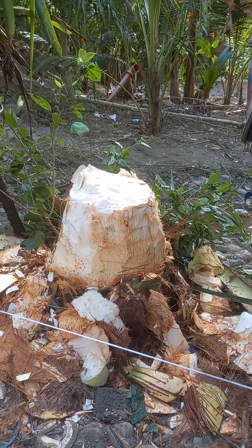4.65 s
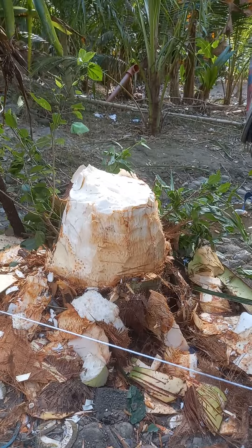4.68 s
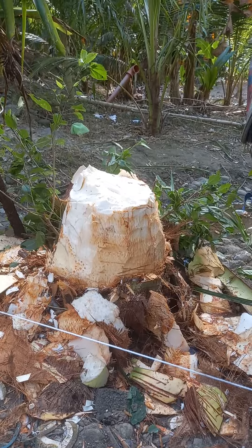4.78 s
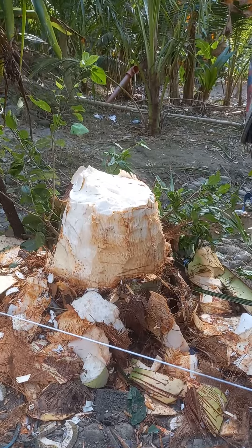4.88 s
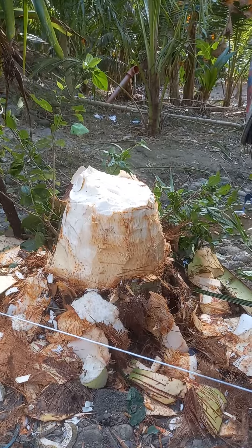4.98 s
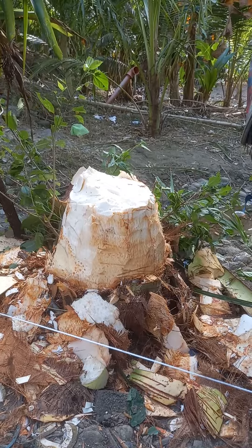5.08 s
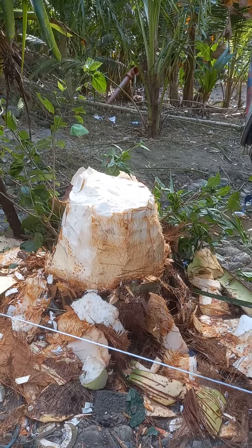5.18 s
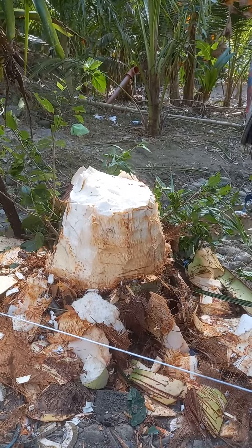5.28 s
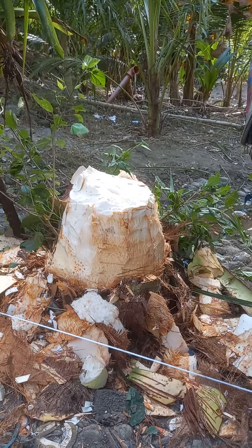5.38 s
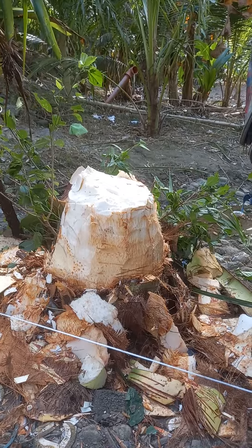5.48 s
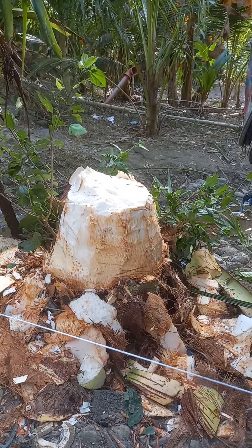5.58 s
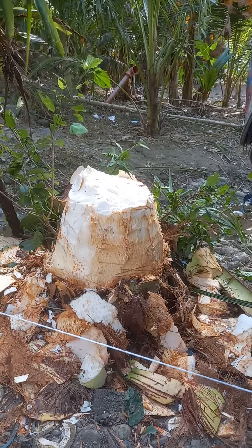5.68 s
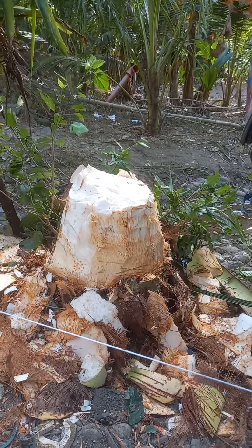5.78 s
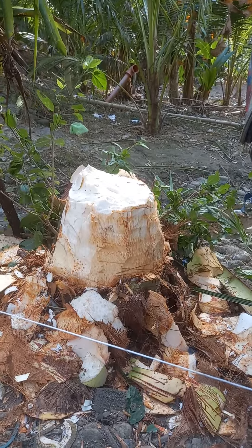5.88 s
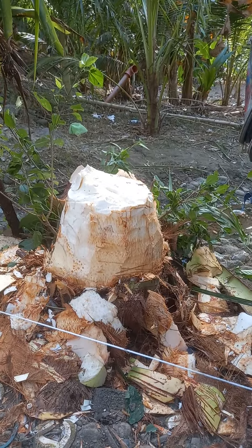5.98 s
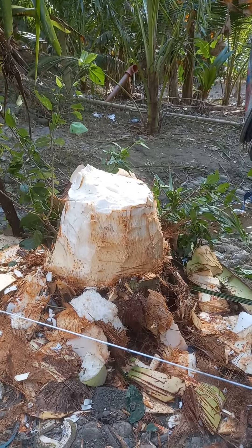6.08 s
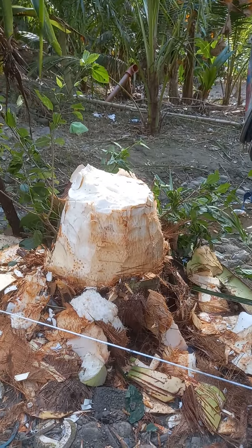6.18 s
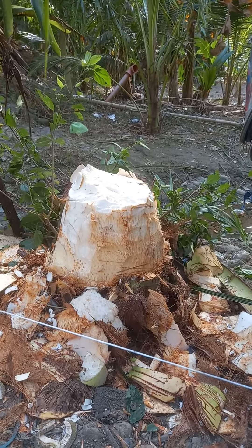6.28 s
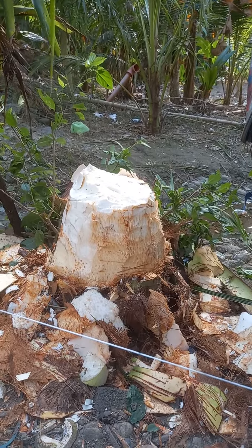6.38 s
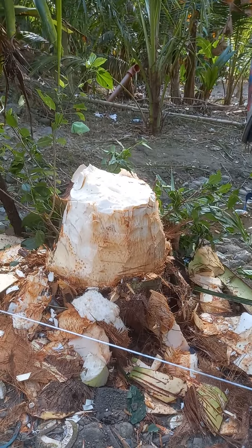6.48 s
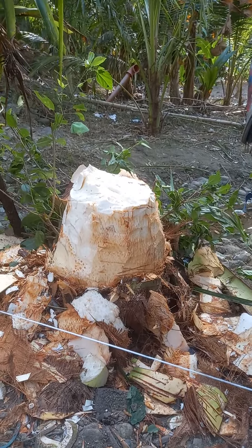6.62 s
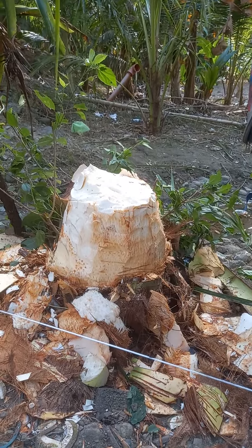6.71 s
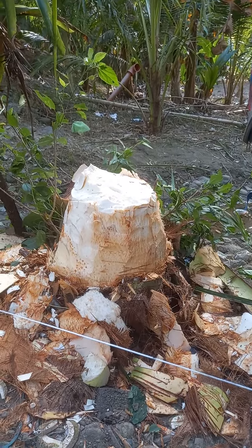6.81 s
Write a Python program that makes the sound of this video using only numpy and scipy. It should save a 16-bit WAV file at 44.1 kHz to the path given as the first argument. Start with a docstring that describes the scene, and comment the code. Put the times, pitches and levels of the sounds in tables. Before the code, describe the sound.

Outdoors in a palm grove, a low motor hum wavers in the distance, strongest at the start. From 0.1 to 0.6 seconds a pig very close by growls and jumps into a rough squeal. A second hoarse cry comes at 0.95 to 1.45. Feet then knock lightly, with sharp crackles of dry husk near 2.1, rustling litter and a faint rising chirp at 1.9. The third call, 2.2 to 3.6, growls, breaks, then climbs to the shrillest, raspiest squeal. Wind begins buffeting both sides unevenly from 3.1 onward. Leaves stir at 3.7 and the bird chirps at 3.9. A fourth squeal runs 3.95 to 4.85, a short soft snort follows at 5.1, another chirp at 5.2, and the last harsh squeal rises, cracks and drops from 5.25 to 6.4. Rustles, small scuffs and gusts finish by 6.85. Echoes are short and diffuse.

```python
"""In a palm grove a pig close by calls five times and snorts once.
Each call opens as a growl of slow flaps ringing the throat and climbs into a rough squeal of two beating
vibrations. Feet knock in dry husks (ringing crackle) and litter rustles (noise that swells and fades).
A bird chirps upward three times (swept sines), a far motor hums (a wavering tone and its octave), and
gusts buffet the two microphone ports (unrelated low noise)."""
import sys
import numpy as np
from scipy import signal
from scipy.fft import rfft, irfft
from scipy.io import wavfile
from scipy.ndimage import uniform_filter1d

SR = 44100
rng = np.random.default_rng(int(sys.argv[2]) if len(sys.argv) > 2 else 0)


def to_wav(sig):
    """Store sig (one row per channel, or 1-D mono) as 16-bit WAV at the path in sys.argv[1].

    Samples outside -1..1 are clipped; the rate is SR.
    """
    pcm = np.clip(np.atleast_2d(sig), -1, 1) * 32767
    pcm = np.round(pcm).astype(np.int16)
    wavfile.write(sys.argv[1], SR, pcm.T)  # frames by channels


N = 302085

# Buffeting noise spectrum. Each row: frequency in Hz, relative density in dB per Hz.
BUFFET_SPECTRUM = [(25, -33.5), (50, -21), (75, 10), (100, 0.5), (150, -5), (250, -45), (500, -62)]
# Gusts. Each row: centre in seconds, level in dB, width between 1/e points in seconds, left over right in dB.
GUSTS = [(3.113, -34.5, 0.071, -12.5), (3.2, -36, 0.051, -19.5), (3.362, -29, 0.13, 18),
         (3.523, -33.5, 0.28, 17), (3.762, -32, 0.16, 15.5), (4.086, -35.5, 0.048, -1.5),
         (4.158, -38, 0.1, 24.5), (4.408, -38, 0.073, 3.5), (4.732, -43, 0.23, 22.5),
         (4.904, -33, 0.1, 2.5), (5.043, -40, 0.13, -18.5), (5.301, -28.5, 0.18, -6.5),
         (5.538, -32, 0.077, 19), (5.859, -37.5, 0.78, -4.5), (6.437, -32, 0.043, 5.5),
         (6.573, -33, 0.11, 21.5), (6.737, -34, 0.15, 10), (6.85, -29.5, 0.081, -11.5)]
# Motor hum. Each row: time in seconds, level in dB.
HUM_LEVEL = [(0, -40.5), (.44, -54.5), (.62, -41.5), (.7, -56.5), (.78, -59.5), (.85, -65), (.92, -43),
             (1.45, -45), (1.57, -51), (1.65, -46.5), (2.0, -51.5), (2.5, -44.5), (2.85, -65.5),
             (3.05, -53.5), (6.85, -57)]
HUM_HZ = 93.2
# Stirring leaves and litter. Each row: time in seconds, level in dB, dull part relative to the leaves in dB.
RUSTLE_LEVEL = [(0, -61, -10), (.68, -59, -8), (.75, -68, -9), (.81, -45.5, -8), (.86, -65, 0),
                (1.6, -62.5, -5), (1.85, -50.5, -8), (1.92, -44, -8), (2.02, -50, -8.5), (3.63, -54.5, 15),
                (3.72, -42.5, -4), (3.84, -47, 0), (3.9, -66.5, 15), (4.9, -49.5, 8), (5.04, -44.5, -11.5),
                (5.16, -58, -8), (6.42, -43, 0.5), (6.65, -48, -10), (6.78, -44, -1), (6.85, -66, -30)]
# Leaf noise spectrum. Each row: frequency in Hz, relative density in dB per Hz.
LEAF_SPECTRUM = [(1060, -43.5), (1800, -12.5), (2160, -11.5), (3880, -13), (4570, -7), (5390, -7.5),
                 (6470, -7.5), (8910, -51), (16000, -17)]
# Rising chirps. Each row: start in seconds, length in seconds, first and last frequency in Hz, relative level in dB.
CHIRPS = [(1.918, 0.12, 5030, 7030, -38.5), (3.857, 0.089, 4920, 6440, -45),
          (5.224, 0.1, 4950, 6800, -45.5)]
# Knocks and scuffs. Each row: start in seconds, overall level in dB, dull part in dB, bright part in dB,
# left over right in dB; the levels are relative.
KNOCKS = [(0.7877, -43, -6.5, -17, 8), (1.4495, -24.5, -14, -35, -3.5), (1.773, -31.5, -15, -31, -6.5),
          (1.84, -27, -23, -34, -4), (1.914, -32, -9, -29, -6), (2.065, -27, -51, -21, -7),
          (2.0968, -14, -4, 1.5, 0.5), (2.1358, -7, -4.5, -7, 0), (2.1818, -13.5, 5.5, 1, -3),
          (2.951, -17, -5.5, 5, 1), (4.0634, -16.5, -34, -19, -3), (4.6968, -21, -39, 14, 6.5),
          (5.0314, -43, -8, -35, -14), (6.428, -38.5, 1, -13, -5), (6.479, -49, -29, -9, 1),
          (6.538, -28.5, -4, -29, -6), (6.573, -36.5, 4, -17, 4), (6.611, -34.5, -0.5, -29, -3),
          (6.639, -34.5, 5, -31, -11), (6.6492, -30.5, 11.5, -40, -2.5), (6.694, -39, -4, -28, 11),
          (6.7017, -33.5, 8.5, -26, -6)]
# Resonances of a dry husk. Each row: frequency in Hz, relative width in Hz (widened in use), level in dB.
HUSK_RESONANCES = [(633, 83, 12), (1250, 187, 4), (1460, 130, 1), (3020, 1500, -4), (4420, 74, 5.5),
                   (5630, 63, -20)]
KNOCK_T60_S, KNOCK_RISE_S = .12, .002
SNAP_DB, SNAP_T60_S = -2.0, .02  # the sharp first snap of a knock

# Squeals, one table a call. Each row: time in seconds, pitch in Hz, then relative levels in dB of the tone,
# its octave, the throat sound and the rasp.
SQUEALS = [
    [(0.08, 665.9, -49.5, -48.5, -38.5, -39.5), (0.12, 708.8, -19.5, -24.5, -21, -30),
     (0.258, 652.4, -18, -48.5, -28.5, -25), (0.346, 708.5, -22, -28.5, -23, -28),
     (0.38, 669.3, -25.5, -33.5, -23.5, -26), (0.43, 1008, -26.5, -18.5, -17, -18),
     (0.51, 1006, -29.5, -41.5, -32, -41.5), (0.604, 956.4, -71.5, -64, -77, -51),
     (0.62, 1020, -67, -71, -65, -49.5)],
    [(0.94, 771, -57, -61, -63.5, -54), (0.98, 784.5, -27, -37.5, -18.5, -19),
     (1.062, 700, -20, -50, -24, -27.5), (1.11, 766, -19, -30, -19.5, -20.5),
     (1.19, 740, -21, -36, -24, -24.5), (1.28, 887, -53.5, -40, -38, -23.5),
     (1.308, 635.4, -23, -38, -36, -24), (1.354, 679.5, -37, -36, -33.5, -26),
     (1.384, 597, -37, -42, -45.5, -32.5), (1.48, 580, -73, -59, -77, -59)],
    [(2.17, 689, -44, -47, -20.5, -41), (2.186, 676.8, -37, -24, -32, -45),
     (2.206, 639.9, -39, -30, -23.5, -13.5), (2.278, 668, -14, -41, -16, -22.5),
     (2.32, 900, -15.5, -16, -17, -10), (2.37, 930, -29, -19.5, -17.5, -15),
     (2.42, 800, -32.5, -53, -22, -19.5), (2.516, 884, -71, -34.5, -34, -21.5),
     (2.698, 967, -36, -39, -38, -17.5), (2.734, 1151, -33.5, -23.5, -57, -20.5),
     (2.848, 1293, -34.5, -29.5, -25, -28.5), (3.042, 1357, -21, -20.5, -26.5, -15),
     (3.224, 1332, -27, -22, -26, -15.5), (3.26, 1165, -23.5, -25.5, -32, -17),
     (3.39, 1230, -23.5, -31, -33, -17), (3.415, 971.3, -33, -30.5, -30.5, -21.5),
     (3.486, 944.3, -28.5, -33.5, -22, -27), (3.62, 953, -68, -57, -62, -51)],
    [(3.93, 720, -55, -71, -44, -40), (3.974, 777, -35, -56, -22, -17.5), (4.102, 810, -21, -44, -24, -32),
     (4.166, 785, -18, -13, -16, -27.5), (4.212, 765, -27, -41, -30.5, -26),
     (4.262, 741.3, -17, -19.5, -29, -23), (4.362, 751, -20.5, -35, -21, -22),
     (4.38, 843.4, -21, -20.5, -21.5, -20), (4.448, 851, -23, -22.5, -21, -18.5),
     (4.532, 1037, -37, -26, -39, -19), (4.728, 1035, -17, -18, -25.5, -19.5),
     (4.775, 1030, -26.5, -27, -25.5, -24), (4.86, 1021, -54, -41, -41, -39)],
    [(5.23, 769.8, -56, -74, -52.5, -70), (5.268, 778, -33, -30, -20.5, -29),
     (5.392, 792, -26, -12, -25, -31.5), (5.412, 787.7, -19, -18, -16.5, -16),
     (5.428, 904, -23, -27.5, -21, -21.5), (5.51, 1178, -26.5, -24.5, -17.5, -20),
     (5.62, 1185, -25, -32, -24.5, -19), (5.76, 1155, -20.5, -26, -32, -20.5),
     (5.86, 1130, -16.5, -32, -33, -23), (5.982, 1021, -37, -25, -23, -18.5),
     (6.03, 990, -54, -26, -24.5, -25.5), (6.06, 860, -25.5, -35, -22.5, -28.5),
     (6.1, 995, -63, -27, -26, -19), (6.165, 1000, -39.5, -31.5, -30.5, -17),
     (6.185, 758.5, -20, -38, -25.5, -19), (6.266, 624.4, -26.5, -22.5, -35, -28),
     (6.32, 614.6, -30, -40.5, -40, -32), (6.39, 674.2, -45, -64, -42.5, -47)],
]
# Second, lower vibration of the larynx, one table a call. Each row: time in seconds, pitch in Hz, level in dB.
UNDERTONES = [
    [(.38, 489, -43.5), (.45, 499.6, -35.5), (.5, 515, -32), (.6, 528, -93)],
    [(1.08, 468, -25.5), (1.15, 472, -33.5), (1.22, 468.7, -33), (1.3, 448.3, -46.5)],
    [(2.4, 454, -49), (2.48, 488, -22.5), (2.56, 441.6, -59), (2.76, 476.7, -34), (3.1, 478, -40.5),
     (3.2, 532, -42), (3.3, 597, -27), (3.36, 598.5, -73)],
    [(4.38, 544, -56), (4.41, 550.7, -21.5), (4.445, 558, -31), (4.47, 463.5, -24), (4.52, 502, -25),
     (4.72, 579, -29), (4.81, 529.3, -43)],
    [(5.42, 468, -30.5), (5.59, 508.6, -28.5), (5.85, 508.5, -25.5), (6.16, 498, -25.5), (6.3, 520, -32.5),
     (6.38, 482, -37)],
]
# Clear upper partials, one table a call. Each row: time in seconds, relative levels in dB of the third and fourth.
PARTIALS = [
    [(.4, -46.5, -53), (.44, -20, -21), (.5, -40.5, -39), (.6, -57, -60)],
    [(1.1, -37.5, -58.5), (1.16, -32, -25.5), (1.23, -58, -42.5), (1.26, -28, -24), (1.3, -43, -40),
     (1.33, -41, -59), (1.4, -36, -58)],
    [(2.3, -32, -33), (2.52, -38, -38), (2.64, -25, -31.5), (2.74, -28, -18.5), (2.83, -29, -22),
     (2.95, -25.5, -36), (3.03, -13, -17), (3.09, -17.5, -50), (3.24, -75, -29), (3.3, -49, -57),
     (3.4, -46, -40), (3.43, -25.5, -49), (3.52, -46, -52)],
    [(4.2, -60, -57), (4.45, -64.5, -23.5), (4.52, -44, -30), (4.56, -20, -27), (4.59, -25, -32),
     (4.64, -18, -33), (4.69, -30.5, -43), (4.73, -20, -21), (4.8, -48, -60)],
    [(5.43, -56, -16), (5.51, -34.5, -28), (5.79, -41, -50), (5.93, -45, -17.5), (6.02, -45, -26),
     (6.09, -53, -58), (6.125, -24, -22), (6.16, -50, -47), (6.3, -48, -43)],
]
# How broken the squeal is. Each row: time in seconds, roughness from 0 to 1.
ROUGHNESS = [(.26, .8), (.33, .45), (.4, .6), (.46, .6), (1.05, .8), (1.11, .4), (1.27, .5), (1.35, .4),
             (1.4, .8), (2.28, .7), (2.32, .35), (2.4, .4), (2.45, .7), (2.55, .3), (2.8, .45), (3.18, .42),
             (3.35, .65), (3.5, .9), (4.0, .5), (4.3, .38), (4.45, .6), (4.6, .5), (5.5, .55), (5.62, .33),
             (5.98, .35), (6.03, 1), (6.09, .9), (6.12, .45), (6.16, .5), (6.19, .8), (6.3, .9)]
# Colour of each call. Each row: octave of the lower vibration in dB, extra upper rasp in dB, sum line in dB,
# valley in the rasp in Hz, throat pitch shift in semitones; the levels are relative.
CALL_COLOURS = [(-18.5, 11, -18, 3400, 0.01), (1.5, 7.5, -30.5, 3400, 0.07), (-23, 5.5, -3.5, 3570, 0.01),
                (0.5, 9, -31.5, 3448, 0.055), (-6, 6.5, -9, 3039, 0.076)]
# Upper rasp against lower rasp. Each row: squeal pitch in Hz, relative level in dB.
SHRILLNESS = [(650, -7.5), (1000, -3.5), (1350, 2)]
# Slack folds flapping before they tighten. Each row: start in seconds, length in seconds,
# chest thrum relative to the throat level in dB.
GROWLS = [(0.089, 0.21, -17.5), (0.95, 0.16, -7), (2.13, 0.16, -11.5), (2.43, 0.072, -8.5),
          (3.893, 0.24, -15.5), (5.246, 0.16, -15)]
# The hardest flaps of the growl. Each row: time in seconds, relative level in dB.
FLAPS = [(0.081, -28), (.105, 0.5), (0.122, 6.5), (0.944, -10), (0.963, 6), (0.979, 4.5), (2.223, 10.5),
         (3.949, -2), (3.968, 11.5), (4.112, 7), (5.229, -36), (5.252, -7), (5.269, 8), (5.347, 7.5)]
# Throat and snout at rest. Each row: frequency in Hz, relative width in Hz (widened in use), level in dB.
THROAT_RESONANCES = [(85, 60, -7), (210, 55, -3), (380, 78, 2), (560, 110, -8), (830, 130, -5),
                     (1160, 110, -8), (1590, 105, -2), (2450, 260, -16), (3840, 170, -15)]
# The mouth wide open. Each row: frequency in Hz, gain in dB.
MOUTH_GAIN = [(1060, -2), (1800, 5), (2090, -13.5), (2340, -19), (2690, -10), (3100, -6.5), (3560, -10.5),
              (4100, -7.5), (4620, -10), (5840, -10), (7500, -22.5), (9750, -68), (16500, -120)]
# Air in the open throat. Each row: frequency in Hz, gain in dB.
HOARSE_GAIN = [(250, -65), (400, -11), (700, 23), (1200, -9.5), (1700, 8.5), (2300, -64.5), (3000, 3.5)]
# Snort noise spectrum. Each row: frequency in Hz, relative density in dB per Hz.
SNOUT_SPECTRUM = [(200, -22), (350, 4.5), (600, -5.5), (850, -0.5), (1150, -20), (1500, -34)]
SNORT_S, SNORT_LENGTH_S, SNORT_DB = 5.099, .075, -42
TIGHTEN_S, SLACK_SHARE = .074, .073  # time taken by tightening, least share of flapping
CHEST_HZ, CHEST_WIDTH_HZ, CHEST_RISE_S = 96, 28, .087
THROAT_WANDER, THROAT_RISE = .03, .04  # shares of each resonance: random drift, rise as the folds tighten
VALLEY_DEPTH, VALLEY_WIDTH_HZ = .97, 650

# Echo decay in the grove. Each row: frequency in Hz, time to fall by 60 dB in seconds.
GROVE_DECAY = [(100, .2), (1000, .18), (6000, .17)]
# Microphone path. Each row: frequency in Hz, gain in dB.
MICROPHONE_GAIN = [(20, -24.5), (60, 3), (6600, -0.5), (7300, -16), (8000, -33.5), (10000, -35),
                   (13500, -31), (15300, -29.5)]
EDGE_HZ = 15900


def gain_of(db):
    """Level law: decibels to amplitude."""
    return 10 ** (np.asarray(db) / 20)


def evened(x):
    """Normalisation of power: scales to rms 1."""
    return x / np.sqrt(np.mean(x ** 2) + 1e-20)


def read(points, hz):
    """Interpolation along a logarithmic frequency axis."""
    f, value = np.transpose(points)
    return np.interp(np.log(hz + 1), np.log(f + 1), value)


def coloured(x, points):
    """Linear filtering: each frequency of the last axis is multiplied by its gain."""
    hz = np.fft.rfftfreq(x.shape[-1], 1 / SR)
    return irfft(rfft(x) * gain_of(read(points, hz)), x.shape[-1])


def played(rows):
    """Linear interpolation of curves in time, with a gate open only while the table lasts."""
    s, *columns = np.transpose(rows)
    t = np.arange(N) / SR
    gate = np.clip(np.minimum(t - s[0], s[-1] - t) / 0.0023, 0, 1)
    return gate, *(np.interp(t, s, c) for c in columns)


def joined(tables):
    """Concatenation of call curves: pitch runs on while levels fall silent between calls."""
    gate, hz, *levels = played(np.concatenate(tables))
    on = sum(played(rows)[0] for rows in tables)
    return hz, *(on * gain_of(db) for db in levels)


def chance(hz):
    """Low-passed noise: random drift of rms 1 up to about hz."""
    lowpass = signal.butter(2, hz, fs=SR, output="sos")
    return evened(signal.sosfilt(lowpass, rng.standard_normal(N)))


def phase(hz):
    """Phase is the running integral of frequency."""
    return 2 * np.pi * np.cumsum(hz) / SR


def resonate(x, hz, width):
    """Heterodyne resonance: shifts hz, fixed or moving, to zero, smooths, and shifts back, with gain 1."""
    turn = np.exp(1j * phase(hz * np.ones(x.shape[-1])))
    r = np.exp(-np.pi * width / SR)
    return 2 * (turn * signal.lfilter([1 - r], [1, -r], x / turn)).real


def patchy(x, patchy_db, size=(6, 14)):
    """Random modulation: loud and quiet patches spread over time and frequency."""
    z = signal.stft(x, nperseg=1024, noverlap=768)[2]
    field = rng.standard_normal(z.shape[-2:])
    field = uniform_filter1d(field, size[0], 0)
    field = evened(uniform_filter1d(field, size[1], 1))
    y = signal.istft(z * gain_of(patchy_db * field), nperseg=1024, noverlap=768)[1]
    return evened(y[..., :N])


def panned(pan_db):
    """Level difference: half the decibels raise the left side, half lower the right."""
    return pan_db * np.array([[.5], [-.5]])


def wind():
    """Turbulent buffeting: low noise unrelated at the two ports, each gust swelling and fading on its own side."""
    t = np.arange(N) / SR
    level = sum(gain_of(db + panned(pan)) * np.exp(-(2 * (t - s) / length) ** 2)
                for s, db, length, pan in GUSTS)
    return level * evened(coloured(rng.standard_normal((2, N)), BUFFET_SPECTRUM))


def hum():
    """Periodic vibration: a wavering low motor tone and its weak, fuzzy octave."""
    gate, db = played(HUM_LEVEL)
    turn = phase(HUM_HZ * (1 + 0.02 * chance(8.8)))
    tone = (1 + 0.71 * chance(11.4)) * np.cos(turn)
    octave = 0.16 * chance(57) * np.cos(2 * turn)
    return gain_of(db) * (tone + octave)


def rustle():
    """Random friction: noise of leaves, with a duller part from the ground."""
    gate, db, dull_db = played(RUSTLE_LEVEL)
    leaves = patchy(coloured(rng.standard_normal((2, N)), LEAF_SPECTRUM), 4.5)
    dull = [(120, -20.0), (220, 10.0), (1500, 2.0), (2400, -24.5)]
    ground = patchy(coloured(rng.standard_normal((2, N)), dull), 6.9)
    return gain_of(db) * (leaves + gain_of(dull_db) * ground)


def bird():
    """Frequency modulation: a near sine sweeps upward, a little unsteady, swelling and fading."""
    out, level, pitch = np.zeros(N), chance(150), chance(220)
    for s, length, first_hz, last_hz, db in CHIRPS:
        u = np.clip((np.arange(N) / SR - s) / length, 0, 1)
        hz = (first_hz + (last_hz - first_hz) * u ** 1.3) * (1 + .006 * pitch)
        swell = np.sin(np.pi * u) ** 0.38 * (u < 1)
        out += gain_of(db) * swell * (1.5 + 0.12 * level) * np.cos(phase(hz))
    return out


def knocks():
    """Impulsive excitation: bursts of crackle ring dry husks and die fast."""
    out, t = np.zeros((2, N + SR)), np.arange(SR // 3) / SR
    decay = gain_of(-60 * t / KNOCK_T60_S) + gain_of(SNAP_DB - 60 * t / SNAP_T60_S)
    envelope = decay * np.minimum(t / KNOCK_RISE_S, 1)
    for s, db, dull_db, bright_db, pan in KNOCKS:
        burst = rng.standard_normal((2, len(t))) * envelope
        burst += 0.14 * burst[::-1]  # each side leaks into the other
        ring = sum(gain_of(d) * resonate(burst, f, 1.79 * w) for f, w, d in HUSK_RESONANCES)
        tilt = [(150, dull_db - 0.5), (300, dull_db), (1200, dull_db), (1800, 0.039)]
        bright = gain_of(bright_db) * coloured(burst, [(6000, -24.0), (8000, 6.0)])
        sound = coloured(ring, tilt) + bright
        out[:, round(s * SR):][:, :len(t)] += gain_of(db + panned(pan)) * sound
    return out[:, :N]


def snort():
    """Turbulent flow: fluttering air through the snout, quick to start and fading out."""
    u = (np.arange(N) / SR - SNORT_S) / SNORT_LENGTH_S
    shape = np.clip(25 * u, 0, 1) * np.clip(1 - u ** 2, 0, 1)
    air = evened(coloured(rng.standard_normal(N), SNOUT_SPECTRUM))
    return gain_of(SNORT_DB + 3.0 * chance(49)) * shape * air


def throat_ring(drive, stretch):
    """Source and filter: steep resonances of throat and snout, each drifting a little at random."""
    out = 0
    for k, (f, w, db) in enumerate(THROAT_RESONANCES):
        hz = f * stretch * (1 + THROAT_WANDER * chance(14))
        ring = resonate(resonate(drive, hz, 1.5 * w), hz, 1.5 * w)
        out = out + (-1) ** k * gain_of(db) * ring
    return out


def hard_flaps(stretch):
    """Impulse response: single strong slaps of the folds, each with a short puff, ring the throat."""
    drive, puff = np.zeros(N), np.exp(-np.arange(600) / SR / 0.00077)
    for s, db in FLAPS:
        air = puff * rng.standard_normal(600)
        drive[round(s * SR):][:600] += gain_of(db) * np.r_[6.0, air[1:]]
    return coloured(throat_ring(drive, stretch), [(300, -9), (1500, 0), (4000, -3)])


def growl(stretch):
    """Relaxation oscillation: uneven slow flaps, clicks with dying puffs, ring the throat and thrum in the chest."""
    turns = np.cumsum(56 * np.exp(.22 * chance(25))) / SR  # about 56 flaps a second
    flaps = np.diff(np.floor(turns), prepend=0) * gain_of(2.5 * chance(30))
    puffs = (.15 + np.exp(-(turns % 1) / .25)) * rng.standard_normal(N)
    t = np.arange(N) / SR
    slack, thrum = [], 0
    for s, length, db in GROWLS:
        part = (t >= s) * np.clip(.5 + (s + length - t) / TIGHTEN_S, 0, 1)
        slack.append(part)
        thrum = thrum + gain_of(db) * part * np.clip((t - s) / CHEST_RISE_S, 0, 1)
    chest = resonate(resonate(puffs, CHEST_HZ, CHEST_WIDTH_HZ), CHEST_HZ, CHEST_WIDTH_HZ)
    share = np.maximum(np.max(slack, axis=0), SLACK_SHARE)
    drive = .75 * evened(flaps) + .45 * evened(puffs)
    flapping = evened(throat_ring(drive, stretch * (1 + THROAT_RISE * (1 - share))))
    return share, flapping, thrum * evened(chest)


def two_voices(first, second, low_first, low_octave, sum_line, turn, low_turn, apart, rough):
    """Superposition and modulation: two voices, their partials, and sum and difference lines."""
    tone = first * np.cos(turn) * (1 - rough ** 4 + rough ** 1.2 * chance(70))
    octave = second * np.cos(2 * turn) * (1 - rough ** 2 + 1.3 * rough * chance(100))
    low = low_first * (np.cos(low_turn) + low_octave * np.cos(2 * low_turn)) * (1 + 0.3 * chance(42))
    third, fourth = (sum(gate * gain_of(dbs[k]) for gate, *dbs in map(played, PARTIALS)) for k in range(2))
    # the partials break up and return
    third = third * gain_of(3.5 * chance(9) - 2) * (.8 + 1.3 * rough * chance(60))
    fourth = fourth * gain_of(3.5 * chance(9) - 2) * (.6 + 1.6 * rough * chance(60))
    partials = third * np.cos(3 * turn) + fourth * np.cos(4 * turn)
    lines = sum_line * np.cos(turn + low_turn) + 0.5 * np.cos(turn - low_turn) * apart
    lines = np.sqrt(first * low_first) * lines * (0.7 + 0.41 * chance(32))
    return tone + octave + low + partials + lines


def hoarseness(turn, low_turn, rough):
    """Intermodulation and turbulence: unsteady lines of both voices and patchy air in the open throat."""
    beats = sum(np.cos(m * turn + n * low_turn) * chance(30) * gain_of(3.0 * chance(5) - 3.0 * abs(n))
                for m in range(3) for n in range(-2, 4) if n and m + n > 0)
    air = patchy(rng.standard_normal(N) * (1 + .3 * chance(120)), 3.0)
    mixed = (1 - rough / 2) * evened(beats) + (.08 + rough ** 1.2) * air
    return evened(coloured(mixed, HOARSE_GAIN))


def rasp_bands(hz, turn, low_turn, rough, valley_hz):
    """Modulated harmonics and pulsed jets shaped by the open mouth, split into a lower and an upper band."""
    swing = 1 + np.cos(low_turn) * (.8 + .6 * chance(12)) + .6 * np.cos(2 * low_turn) * chance(10)
    upper = 0
    for k in range(3, 14):
        fuzz = .4 * (k > 4) + 1.5 * rough * chance(40)
        upper = upper + np.cos(k * turn) * fuzz * gain_of(2.5 * chance(6)) * (k * hz < 13000)
    jets = (0.5 + np.cos(turn / 2) ** 4) * rng.standard_normal(N)  # air bursts once a cycle
    jets = patchy(coloured(jets, [(7000, 0), (9500, -36)]), 2.0)
    mouth = [(1700, -40)] + MOUTH_GAIN[2:-2] + [(10500, -7), (13200, -36)]
    bright = coloured(evened(upper * swing) + (.2 + .75 * rough) * jets, mouth)
    bright = bright - VALLEY_DEPTH * resonate(bright, valley_hz, VALLEY_WIDTH_HZ)
    below = coloured(bright, [(4000, 0), (4800, -60)])
    return evened(below), evened(bright - below)


def pig():
    """Nonlinear phonation: growl, two beating vibrations and rasp share each call; the snort is air alone."""
    hz, first, second, throat, rasp = joined(SQUEALS)
    low_hz, low_first = joined(UNDERTONES)
    t = np.arange(N) / SR
    call = np.searchsorted([rows[-1][0] for rows in SQUEALS[:-1]], t)
    *colour_db, valley_hz, semitones = np.array(CALL_COLOURS)[call].T
    low_octave, edge, sum_line = gain_of(colour_db)
    stretch = 2 ** (uniform_filter1d(semitones, size=2000) / 12)
    rough = np.interp(t, *np.transpose(ROUGHNESS))
    turn = phase(hz * (1 + .016 * rough * chance(55)))
    low_turn = phase(low_hz * (1 + .03 * rough * chance(40)))

    share, flapping, chest = growl(stretch)
    apart = hz > 1.8 * low_hz  # the difference line sounds only when the voices lie well apart
    clean = two_voices(first, second, low_first, low_octave, sum_line, turn, low_turn, apart, rough)
    hoarse = hoarseness(turn, low_turn, rough)
    lower, upper = rasp_bands(hz, turn, low_turn, rough, valley_hz)

    body = throat * (share * flapping + (1 - share) * gain_of(-2.5) * hoarse + chest)
    shrill = rasp * edge * gain_of(read(SHRILLNESS, hz))
    cry = (1 - .75 * share) * (rasp * lower + shrill * upper) / 2
    flicker = gain_of(1.07 * chance(24.3))
    return (1 - 0.5 * share) * clean + flicker * (body + cry) + hard_flaps(stretch) + snort()


def grove(x):
    """Multiple scattering: echoes off trunks, other ones for each port, change as the source shifts about."""
    out, sway = 0, 2 * np.pi * 1.7 * np.arange(N) / SR
    for k in range(3):
        # one echo of random sign in every 20 samples
        taps = np.zeros((2, SR // 3))
        at = np.arange(60, SR // 3 - 20, 20) + rng.integers(0, 20, (2, (SR // 3 - 61) // 20))
        np.put_along_axis(taps, at, rng.choice([-1., 1.], at.shape), 1)
        hz, t, z = signal.stft(taps, SR, nperseg=256)
        decay = gain_of(-60 * t / read(GROVE_DECAY, hz)[:, None])
        tail = signal.istft(z * decay, SR, nperseg=256)[1]
        turn = np.sqrt(2 / 3) * np.cos(sway + k * np.pi / 3)
        moving = x * turn * np.ones((2, 1))
        out = out + signal.oaconvolve(moving, tail / np.linalg.norm(tail[0]), axes=1)[:, :N]
    return out


def scene():
    """Direct and scattered sound: the pig close by, the bird farther off, the floor of the grove."""
    background = wind() + hum() * gain_of([[1.5], [-1.5]]) + rustle()
    chirp = bird()
    far = chirp + gain_of(7.5) * grove(chirp)
    animal = pig()
    echoes = coloured(grove(animal), [(300, -9.0), (600, -5.0), (1200, 2), (3000, 2.5), (9000, 2)])
    near = gain_of([[-1.8], [-1.4]]) * animal + echoes
    return background + far + knocks() + near


def record(dry):
    """Saturation and band limit: the loudest peaks round off, the microphone path loses the top treble."""
    rounded = dry / (1 + dry ** 6) ** (1 / 6)
    heard = coloured(rounded, MICROPHONE_GAIN)
    lowpass = signal.firwin(511, EDGE_HZ, window=("kaiser", 9), fs=SR)
    return signal.oaconvolve(heard, lowpass[None], "same")


dry = scene()
out = record(dry)
to_wav(out)
```